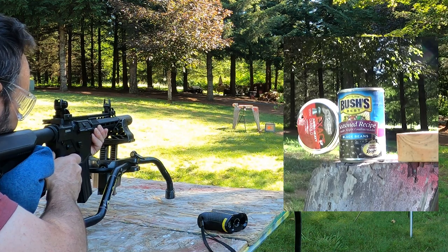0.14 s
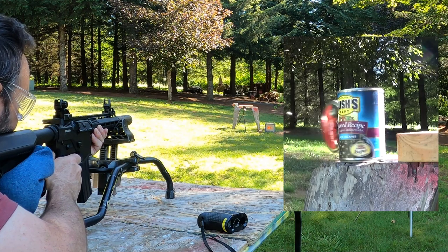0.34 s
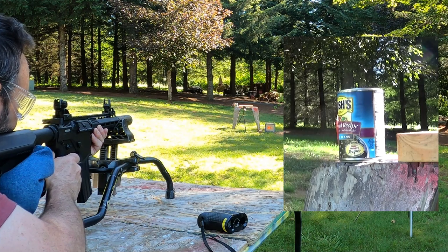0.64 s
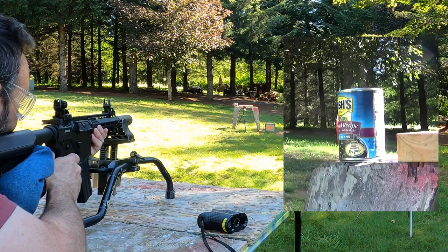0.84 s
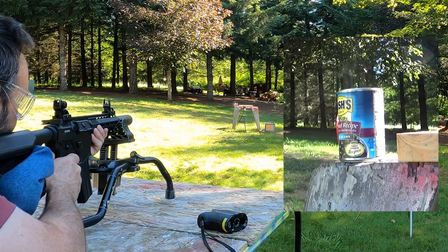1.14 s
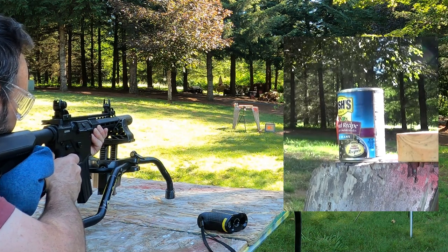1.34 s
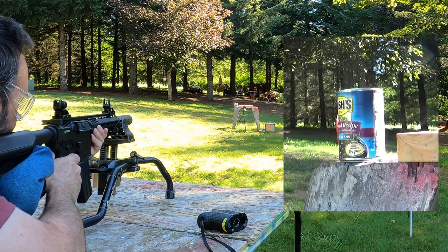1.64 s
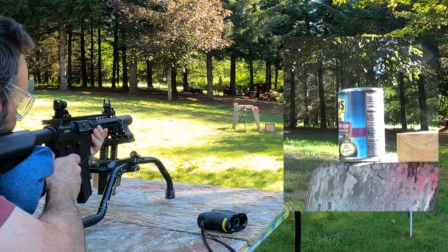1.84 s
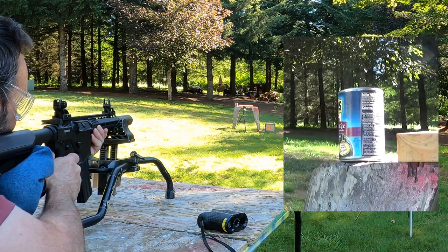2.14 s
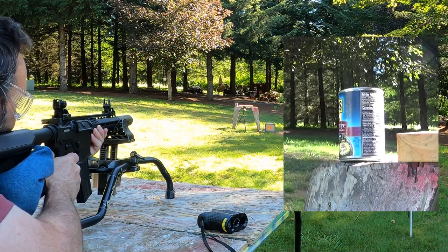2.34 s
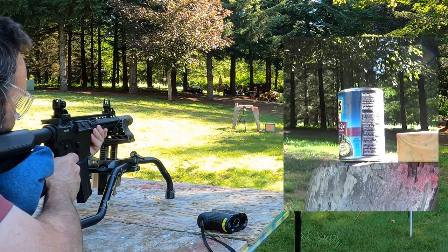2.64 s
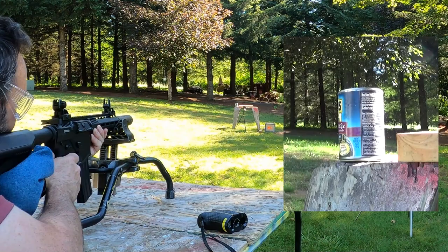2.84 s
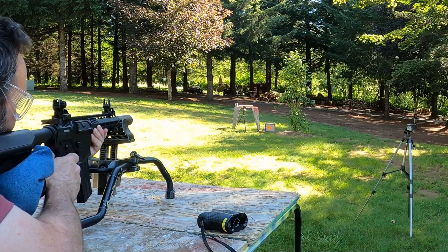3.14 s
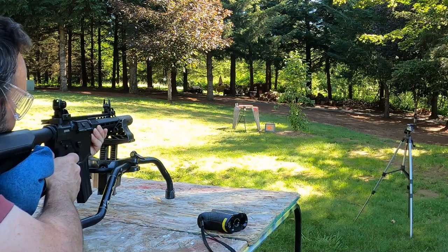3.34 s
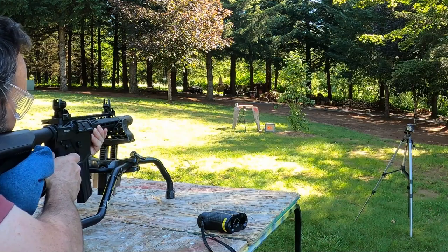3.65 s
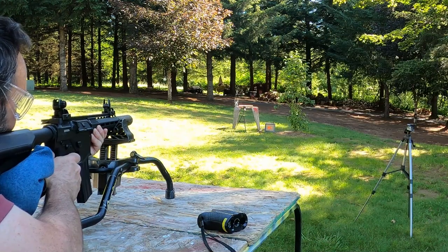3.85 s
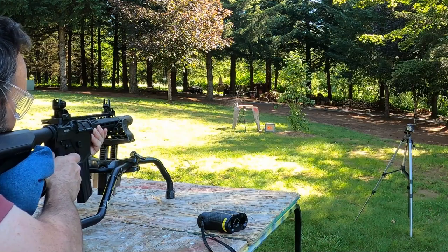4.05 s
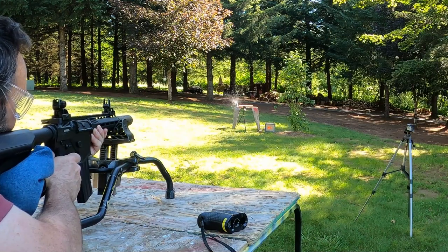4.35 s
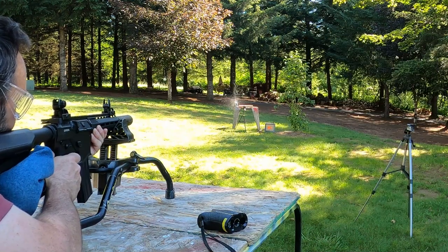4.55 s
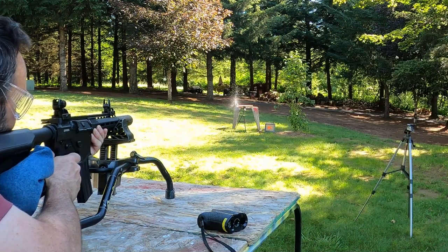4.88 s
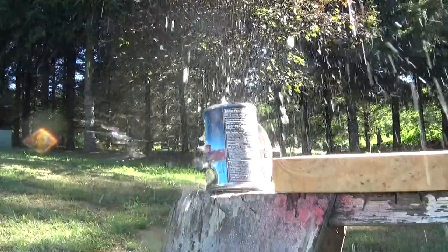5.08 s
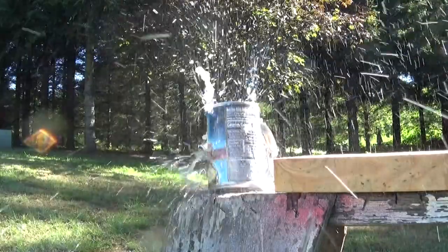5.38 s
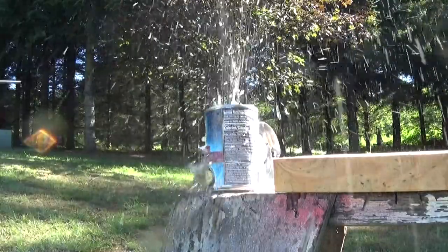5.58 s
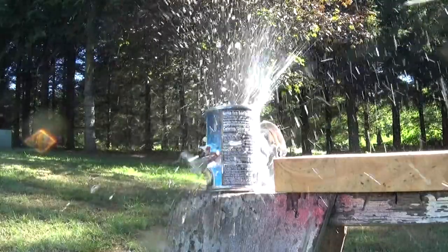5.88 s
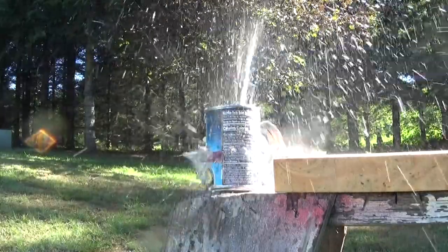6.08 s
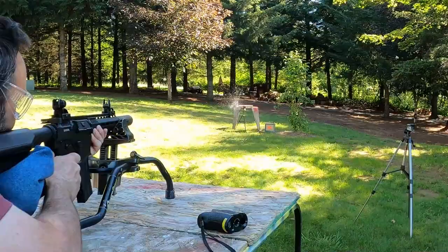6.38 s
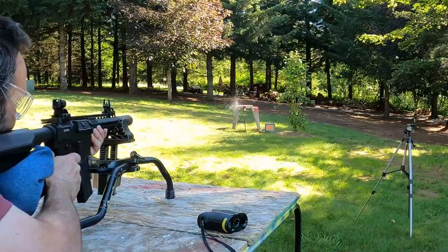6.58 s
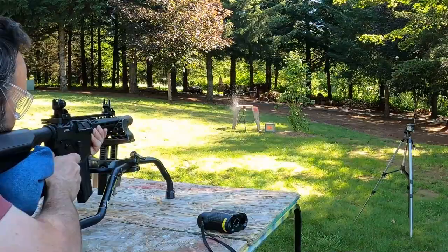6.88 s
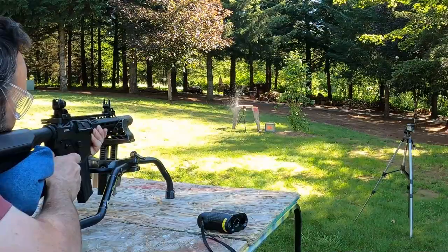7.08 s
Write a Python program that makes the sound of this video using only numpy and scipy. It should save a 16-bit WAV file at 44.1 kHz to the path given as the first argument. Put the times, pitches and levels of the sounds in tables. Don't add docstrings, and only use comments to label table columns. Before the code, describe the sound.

Outdoors, gears clatter and air hisses around two separate shots, a faint can ping follows, then rapid clacking fire runs to the end.

```python
import sys
import numpy as np
from scipy import signal
from scipy.fft import rfft, irfft, next_fast_len
from scipy.io import wavfile
from scipy.ndimage import uniform_filter1d

SR = 44100
rng = np.random.default_rng(int(sys.argv[2]) if len(sys.argv) > 2 else 0)


def wrap_up_sound(samples):
    columns = np.atleast_2d(samples).T
    tamed = np.clip(columns, -1, 1)
    steps = np.round(tamed * 32767).astype(np.int16)
    wavfile.write(sys.argv[1], SR, steps)


def magnitude_from_level(level_db):
    exponent = np.asarray(level_db, float) / 20
    return 10 ** exponent


N = 318402
OPPOSITE = np.array([[1], [-1]])


def evened(x):
    return x / np.sqrt(np.mean(x ** 2) + 1e-20)


def smooth(x, size):
    return uniform_filter1d(uniform_filter1d(x, size=size), size=size)


def read(points, hz):
    f, value = np.transpose(points)
    return np.interp(np.log(hz + 1), np.log(f + 1), value)


def add(mix, s, sound):
    part = mix[..., round(s * SR):][..., :sound.shape[-1]]
    part += sound[..., :part.shape[-1]]


def following(slam_rows, delay_s, db, hz, spread_db):
    when, size, pitch = rng.random((len(slam_rows), 3)).T
    start_s = np.array(slam_rows)[:, 0] + delay_s[0] + when * (delay_s[1] - delay_s[0])
    level_db = db + spread_db * (size - .5)
    return list(zip(start_s, level_db, hz[0] + pitch * (hz[1] - hz[0])))


# band_hz, lead_rad
PORT_LEAD = [(100, 0.13), (3000, 0.7), (7000, .1), (16000, 0.074)]


def noise(spectrum, likeness, patchy_db, size=512):
    hz = np.fft.rfftfreq(size, 1 / SR)
    draws = rng.standard_normal((4 * N // size + 5, len(hz), 5), dtype=np.float32)
    a, b, c, d, patches = draws.T
    patches = uniform_filter1d(uniform_filter1d(patches, size=8, axis=0), size=8, axis=1)
    same = np.clip(read(likeness, hz), -1, 1)[:, None]
    left = a + 1j * b
    right = same * left + np.sqrt(1 - same ** 2) * (c + 1j * d)
    z = np.array([left, right])
    z *= magnitude_from_level(read(spectrum, hz)[:, None] + patchy_db * evened(patches))
    z[0] *= np.exp(1j * read(PORT_LEAD, hz))[:, None]
    return evened(signal.istft(z, nperseg=size, noverlap=3 * size // 4)[1][:, :N])


# band_hz, density_db
YARD_COLOUR = [(26, -41.5), (45, -2.5), (170, -7), (290, -17.5), (672, -20), (2600, -26), (3160, -28),
               (16000, -41.5)]
# band_hz, likeness
YARD_LIKENESS = [(60, 1.0), (180, 1), (550, 0.2), (1650, 0.73), (4970, 0.27), (15000, 0.99)]


def yard():
    traffic = magnitude_from_level(-52.5) * noise(YARD_COLOUR, YARD_LIKENESS, patchy_db=1.4, size=2048)
    return signal.lfilter(*signal.butter(2, 52, "high", fs=SR), traffic)


# time_s, level_db
CRICKET_LEVEL = [(0, -65), (1.3, -56.5), (2.5, -61), (3.1, -55), (7.3, -94)]


def cricket():
    t = np.arange(N) / SR
    chirp = np.exp(-(((t * 30 + .1) % 1 - .5) / 0.091) ** 2)
    chirp *= magnitude_from_level(1.5 * np.repeat(rng.standard_normal(N // 1470 + 1), 1470)[:N])
    level = magnitude_from_level(np.interp(t, *np.transpose(CRICKET_LEVEL)))
    return level * chirp * np.sin(2 * np.pi * 2750 * t) * magnitude_from_level(1.5 * OPPOSITE)


# band_hz, t60_s
TREE_DECAY = [(250, 0.94), (700, 0.34), (1700, 1), (4500, 0.86), (9000, 0.63), (15000, 0.75)]


def trees(x):
    taps = np.zeros((2, SR))
    at = np.arange(200, SR - 20, 20) + rng.integers(0, 20, (2, (SR - 201) // 20))
    np.put_along_axis(taps, at, rng.choice([-1., 1.], at.shape), 1)
    taps[1] = 0.68 * taps[0] + 0.79 * taps[1]
    taps *= np.minimum(np.arange(SR) / SR / 0.038, 1)
    hz, t, z = signal.stft(taps, SR, nperseg=256)
    colour = [(300, -5.5), (1000, -9.5), (1400, -0.5), (9000, 2.0), (15000, -10.5)]
    z *= magnitude_from_level(read(colour, hz)[:, None])
    z *= magnitude_from_level(-60 * t / read(TREE_DECAY, hz)[:, None])
    tail = signal.istft(z, SR, nperseg=256)[1]
    tail /= np.linalg.norm(tail[0])
    return signal.fftconvolve(x.mean(0)[None], tail, axes=1)[:, :N]


# pitch_hz, level_db, t60_s
CAN_MODES = [(367, -18, .8), (1933, -22, .72), (2040, -22, .58), (2519, -20, .66), (2880, -16, .45),
             (2921, -18, 1.2), (3332, -27, .9), (3370, -15, .3), (3871, -17, .4), (3990, -3, .12),
             (4097, -16, .55), (4460, -24, .9), (5130, -28, 1), (5265, -11, .46),
             (900, -31, .9), (1360, -31, .7), (1470, -35, .6), (1740, -36, .5), (5830, -16, .39),
           (6175, -18, .6), (6654, -22, .45), (7181, -22, .58), (7461, -18, .46), (7850, -22, .9),
           (8500, -25, .5), (8877, -24, .45), (9109, -22, .62), (10357, -25, .46)]


def tin():
    out, t = np.zeros((2, N)), np.arange(30000) / SR
    ring = (magnitude_from_level(-2 - 60 * t / 0.06) + magnitude_from_level(-9 - 60 * t / .5)) * rng.standard_normal((2, len(t)))
    ring = signal.lfilter(*signal.butter(2, [2500, 9000], "band", fs=SR), ring)
    modes = CAN_MODES
    for (hz, db, t60_s), cluster in zip(modes, rng.random((len(modes), 2, 2))):
        for k, (a, b) in enumerate(cluster):
            split = 1 + 0.014 * k * (a - .5)
            phase = 2 * np.pi * b + .6 * OPPOSITE * a
            flutter_db = 2.4 * np.sin(2 * np.pi * ((6 + 18 * b) * t + a))
            level = magnitude_from_level(db - 3.4 * k + flutter_db - 60 * t / t60_s)
            ring += level * np.sin(2 * np.pi * hz * split * t + phase)
    add(out, 2.5925, magnitude_from_level(-25 - 1.3 * OPPOSITE) * ring)
    return out


# start_s, pitch_hz, level_db, length_s, rise_hz
SHORT_RINGS = [(0.395, 1242, -24.5, 0.035, -30.5), (0.4, 1984, -24, 0.028, 201.5),
               (0.403, 3000, -29, .032, 0), (0.442, 349, -32.5, .075, 0), (0.437, 945, -37.5, 0.064, 0),
               (0.505, 935, -33.5, 0.047, 5), (0.497, 2450, -29, 0.012, 0),
               (1.897, 2070, -25.5, 0.038, 0.5), (1.899, 3070, -24, 0.019, 0), (1.967, 351, -37, .12, 2),
               (1.996, 2540, -25.5, 0.015, 0), (3.588, 2900, -27, 0.037, 0), (3.59, 1445, -30, 0.034, 0),
               (3.593, 934, -28, 0.073, -2), (3.69, 1433, -29, 0.071, 0), (3.799, 940, -32, 0.097, 0),
               (3.894, 1443, -27.5, 0.064, 0), (3.905, 930, -31.5, 0.066, 0),
               (4.011, 930, -26.5, 0.038, 0), (4.041, 956, -21.5, 0.037, 90), (4.11, 962, -25, 0.043, 50),
               (4.108, 616, -28.5, 0.061, 0), (4.216, 944, -32, 0.073, 2), (4.313, 926, -28.5, .085, 3),
               (4.402, 1123, -28, .026, 0), (4.524, 639, -26.5, 0.045, -5), (4.832, 1100, -25, 0.021, 40),
               (4.915, 1410, -19, 0.0097, -100), (5.023, 1460, -22.5, .012, 0),
               (4.814, 2080, -25.5, .016, 0), (5.124, 1850, -24, 0.014, 0), (5.632, 3270, -22, .014, 0),
               (5.16, 1470, -23, 0.013, 0), (5.43, 748, -27.5, 0.06, 0), (5.585, 3130, -30, 0.021, 0),
               (5.788, 1250, -26.5, 0.015, 200), (5.946, 1045, -28, 0.033, 247),
               (6.044, 1420, -17.5, .014, 0), (6.148, 1150, -21.5, 0.017, 0)]


def notes():
    out = np.zeros((2, N))
    for (s, hz, db, length_s, rise_hz), luck in zip(SHORT_RINGS, rng.random((len(SHORT_RINGS), 2))):
        t = np.arange(0, length_s, 1 / SR)
        waver = 0.5 * np.sin(2 * np.pi * (35 * t + luck[0])) + .3 * OPPOSITE
        turns = hz * t + rise_hz * t * (t / length_s - 1) / 2
        level = magnitude_from_level(db - 9.5 * t / length_s) * signal.windows.tukey(len(t), .4)
        add(out, s, level * np.sin(2 * np.pi * turns + waver))
    return out


# time_s, shaft_hz, level_db
MOTOR_STARTS = [
    [(1.64, 502, -54), (1.67, 590, -48), (1.705, 605, -47)],
    [(3.42, 460, -49), (3.47, 651, -50), (3.505, 602, -33)],
]


def motor():
    out = np.zeros(N)
    wobble = evened(smooth(rng.standard_normal((3, N)), 150))
    for rows in MOTOR_STARTS:
        s, hz, db = np.transpose(rows)
        t = np.arange(s[0], s[-1], 1 / SR)
        w = wobble[:, round(s[0] * SR):][:, :len(t)]
        turns = np.cumsum(np.interp(t, s, hz) * (1 + 0.0085 * w[0])) / SR
        tone = np.zeros(len(t))
        for harmonic, level_db, drift in zip((1, 2, 4), (-3., -4., 3.), w):
            tone += magnitude_from_level(level_db + 2.23 * drift) * np.sin(2 * np.pi * harmonic * turns)
        add(out, s[0], magnitude_from_level(np.interp(t, s, db)) * tone * signal.windows.tukey(len(t), .2))
    return out


# time_s, hiss_db, whirr_db, rumble_db
TRIGGER_PULLS = [
    [(0.085, -31.5, -33, -42), (0.321, -41, -35.5, -46), (0.56, -38, -48, -53.5)],
    [(1.635, -50, -40.5, -47), (1.72, -34.5, -35, -46.5), (1.879, -36, -39.5, -48),
     (2.08, -41, -42.5, -52.5)],
    [(3.42, -46, -36, -47.5), (3.52, -31.5, -34, -44), (3.66, -35, -37, -40.5), (3.94, -36.5, -39, -37.5),
     (4.36, -36, -41, -42.5), (4.86, -37, -39.5, -36.5), (6.1, -38.5, -40, -46), (6.3, -36.5, -48, -53.5),
     (6.45, -35.5, -45, -53)],
]
# centre_s, level_db, half_length_s
AIR_PUFFS = [(0.171, -22, 0.0063), (0.287, -20.5, 0.0033), (0.45, -22, 0.02), (0.496, -19.5, 0.01),
             (1.16, -60, 0.05), (1.783, -30.5, 0.013), (1.963, -32, 0.042), (4.123, -21.5, 0.0081),
             (4.256, -27, 0.024), (5.549, -25.5, 0.021), (5.589, -33.5, 0.015), (5.945, -23, 0.0044),
             (6.106, -28, 0.017)]
# band_hz, density_db
HISS_COLOUR = [(1470, -18.5), (2500, -1), (3520, -0.5), (5390, 1.5), (9960, 2), (12000, -11),
               (14600, -13.5), (16500, -22.5)]
WHIRR_COLOUR = [(350, -25.5), (600, -19.5), (831, 5.5), (1030, -3.5), (1120, 2), (4000, -6.5), (5200, -39),
                (8800, -120)]
RUMBLE_COLOUR = [(88, -38), (150, -11), (249, -18.5), (313, -2.5), (423, -7), (750, -11), (980, -32),
                 (1650, -120)]
# band_hz, likeness
GUN_LIKENESS = [(60, 1), (550, 0.94), (1650, 0.95), (4000, 0.7), (8000, 0.9), (15000, 1)]


def mechanism():
    t, layers = np.arange(N) / SR, np.zeros((3, N))
    for rows in TRIGGER_PULLS:
        s, *levels_db = np.transpose(rows)
        held = np.clip((t - s[0]) / 0.036, 0, 1) * np.clip((s[-1] - t) / 0.03, 0, 1)
        layers += held * magnitude_from_level(np.array([np.interp(t, s, db) for db in levels_db]))
    hiss, whirr, rumble = layers
    slam_s = np.array(SLAMS)[:, 0]
    since_s = t - slam_s[np.searchsorted(slam_s, t) - 1]
    jolt = np.minimum(since_s / 0.0013, 1) - since_s / 0.067
    shaken = np.where((since_s > 0) & (since_s < .12), jolt, -.3)
    rumble, whirr = rumble * magnitude_from_level(9.2 * shaken), whirr * magnitude_from_level(8.1 * shaken)
    around_s = np.arange(-5000, 5000) / SR
    for s, db, half_s in AIR_PUFFS:
        add(hiss, s + around_s[0], magnitude_from_level(db) * np.exp(-(around_s / half_s) ** 2))
    lead_s = np.arange(900) / SR
    leak_db = -33.5 - 2300 * np.maximum(lead_s[::-1] - .005, 0)
    for (s, _, _), weaker in zip(SHOTS, rng.random(len(SHOTS))):
        add(hiss, s - .0018 - 900 / SR, magnitude_from_level(leak_db - 4 * weaker))
    fast = evened(smooth(rng.standard_normal(N), 120))
    slow = evened(smooth(rng.standard_normal(N), 700))
    hiss *= magnitude_from_level(2.74 * fast + 1.1 * slow)
    out = hiss * noise(HISS_COLOUR, GUN_LIKENESS, patchy_db=3.54)
    out += whirr * noise(WHIRR_COLOUR, GUN_LIKENESS, patchy_db=2.2)
    return out + rumble * noise(RUMBLE_COLOUR, GUN_LIKENESS, patchy_db=2.9, size=1024)


# middle_tooth_s, peak_db, centre_hz, thump_db
GEAR_CATCHES = [(0.1032, -6, 7400, -22), (0.2103, -3, 8500, -24), (0.3138, -5.5, 7700, -25.5),
                (0.5021, -27, 7500, -52.5), (1.7116, -10, 8500, -25), (1.815, -6.5, 8480, -25),
                (2.0008, -9, 5900, -49), (3.5079, -5.5, 8900, -23.5)]


def catches():
    out, t = np.zeros((2, N)), np.arange(-200, 3000) / SR
    after, early = np.maximum(t - .004, 0), t - t[0]
    teeth = sum(magnitude_from_level(d) * np.exp(-((t - at) / .0007) ** 2) for at, d in [(-.0028, -8.5), (0, -3.5), (.0027, -4)])
    thump = np.sin(2 * np.pi * 535 * after) * magnitude_from_level(-60 * after / 0.05)
    thump += 0.76 * np.sin(2 * np.pi * 1250 * after) * magnitude_from_level(-60 * after / 0.044)
    push = 0.57 * np.sin(2 * np.pi * 135 * early) * magnitude_from_level(-60 * early / 0.055)
    blow = thump * (1 - np.exp(-after / 0.0018)) + push
    luck = rng.standard_normal((len(GEAR_CATCHES), 2, len(t)))
    for (s, db, hz, thump_db), grit in zip(GEAR_CATCHES, luck):
        band = signal.butter(3, [0.73 * hz, 1.175 * hz], "band", fs=SR)
        grit = signal.lfilter(*band, grit[0] + 0.28 * grit)
        add(out, s + t[0], magnitude_from_level(db - 4.5) * teeth * evened(grit) + magnitude_from_level(thump_db) * blow)
    return out


def whistles():
    length_s = 0.0081
    out, t = np.zeros(N), np.arange(0, length_s, 1 / SR)
    for (s, _, _), (a, b) in zip(SHOTS, rng.random((len(SHOTS), 2))):
        hz = (0.81 + 0.39 * a) * np.interp(t, [0, length_s], (5156, 3000))
        chirp = np.hanning(len(t)) * np.sin(2 * np.pi * np.cumsum(hz) / SR)
        add(out, s - .002 - length_s, magnitude_from_level(-28 - 6 * b) * chirp)
    return out


# start_s, peak_db, pitch_hz
HOLLOW_THUDS = [(1.915, -20.5, 319), (1.934, -23, 379), (1.948, -22, 469), (2.39, -46, 364),
                (3.732, -17, 291), (3.821, -22.5, 316), (3.84, -24.5, 370), (3.934, -20, 326),
                (4.03, -21, 457), (4.181, -16.5, 441), (4.446, -23, 306), (4.526, -21, 317),
                (4.618, -22, 287), (4.64, -20, 313), (4.67, -13, 381), (4.702, -21, 545),
                (4.748, -22.5, 310), (4.938, -20.5, 302), (5.001, -22, 383), (5.066, -24, 360),
                (5.217, -24.5, 388), (5.24, -22.5, 509), (5.314, -18, 339), (5.353, -21.5, 306),
                (5.415, -22, 400), (5.454, -22, 300), (5.499, -18.5, 330), (5.595, -26, 335),
                (5.929, -25, 349), (3.612, -24.5, 403), (4.766, -25, 637), (4.795, -24, 404),
                (4.852, -26, 329), (5.862, -29, 352), (6.056, -27, 542), (5.755, -26.5, 800)]


def thuds():
    out, t = np.zeros((2, N)), np.arange(8000) / SR
    lead = .3 * OPPOSITE
    sag_s = .12 * .012 * (1 - np.exp(-t / .012))
    rows = HOLLOW_THUDS + following(SHOTS[2:], (0.0117, 0.11), -38, (300, 559), spread_db=14.0)
    rows += [(s, -25, 500) for s, _, _ in BLANKS]
    for (s, db, hz), (a, b, c) in zip(rows, rng.random((len(rows), 3))):
        decay = magnitude_from_level(-60 * t / 0.031) + magnitude_from_level(-11.0 - 60 * t / 0.14)
        ring = np.sin(2 * np.pi * hz * (t + sag_s) + lead) * decay
        ring += 0.35 * np.sin(2 * np.pi * hz * (1.3 + .5 * a) * t + lead + 6 * c) * magnitude_from_level(-60 * t / 0.05)
        ring += 0.15 * np.sin(2 * np.pi * hz * (.7 + 0.141 * b) * t + lead) * magnitude_from_level(-60 * t / 0.18)
        add(out, s - .005, magnitude_from_level(db + 5.0) * (1 - np.exp(-t / 0.0026)) * ring)
    return out


# start_s, peak_db, centre_hz
SHARP_SNAPS = [(0.1782, -8, 4400), (0.2917, -9, 5400), (0.5308, -23, 7200), (1.1058, -32, 7600),
               (1.7871, -18, 6600), (2.392, -42, 10000), (3.7074, -12, 10600), (3.7136, -13, 9200),
               (3.8577, -11, 10000), (3.8749, -12, 10000), (4.1039, -11, 9500), (4.1534, -9, 8700),
               (4.4447, -11, 6900), (4.5223, -12, 6800), (4.6375, -14, 8300), (4.8629, -13, 7400),
               (4.9732, -10, 7800), (5.0368, -12, 8900), (5.1379, -9, 5800), (5.1626, -12, 6600),
               (5.2007, -11, 8400), (5.2667, -12, 7100), (5.352, -13, 8400), (5.4407, -13, 8200),
               (5.5484, -11, 9700), (5.5523, -11, 8500), (5.6721, -11, 8100), (5.7859, -16, 8600),
               (5.856, -16, 8600), (6.0114, -13, 7400)]
# start_s, peak_db, centre_hz
FUZZY_TICKS = [(3.6087, -10, 8670), (3.7234, -17, 2100), (3.8137, -18, 2090), (3.9176, -17, 8570),
               (3.9527, -11.5, 8520), (4.06, -9, 10100), (4.2426, -7, 2100), (4.33, -7.5, 6170),
               (4.365, -11, 9900), (4.424, -7, 7050), (4.4742, -13, 9490), (4.559, -29, 3070),
               (4.6952, -9, 8610), (4.781, -18, 6110), (4.802, -13, 9750), (4.8375, -10, 9000),
               (4.8946, -11, 10000), (5.0456, -3.5, 9150), (5.256, -8, 6100), (5.2814, -25, 8960),
               (5.3095, -10, 6610), (5.4814, -17, 9000), (5.5144, -10, 9700), (5.649, -18, 7800),
               (5.696, -14, 6260), (5.7296, -11, 8000), (5.7574, -16, 8950), (5.8037, -13, 8530),
               (5.8271, -13, 8770), (5.915, -14, 8640), (5.9688, -21, 8660), (6.03, -5.5, 4000),
               (6.0716, -15, 4680), (6.0911, -5, 4990), (6.237, -18, 8100)]


def snaps():
    out, t, hz = np.zeros((2, N)), np.arange(512) / SR, np.fft.rfftfreq(512, 1 / SR)
    sharp = SHARP_SNAPS + following(SHOTS, (0.0016, .004), -13.5, (6300, 8300), spread_db=6)
    sharp += following(BLANKS * 3, (0, .006), -19, (5600, 7000), spread_db=6)
    fuzzy = [(s + .001, db - 10, centre_hz) for s, db, centre_hz in FUZZY_TICKS]
    fuzzy += following(2 * SHOTS[2:], (.009, .09), -26, (2800, 12600), spread_db=6)
    for rows, t60_s in ((sharp, 0.0027), (fuzzy, 0.011)):
        grit, sides = rng.standard_normal((len(rows), 512)), rng.standard_normal((len(rows), 1))
        shape = np.minimum(t / 0.00024, 1) * magnitude_from_level(-60 * t / t60_s)
        for (s, db, centre_hz), g, side in zip(rows, grit, sides):
            spread_hz = 3500 + 0.9 * max(8500 - centre_hz, 0)
            floor_hz = 700 + 0.67 * max(centre_hz - 5500, 0)
            band = np.exp(-((hz - centre_hz) / spread_hz) ** 2 - (floor_hz / (hz + 1)) ** 2)
            burst = shape * irfft(rfft(g) * band)
            add(out, s - .0004, magnitude_from_level(db + 6.5 + .5 * side * OPPOSITE) * burst / abs(burst).max())
    return out


# start_s, peak_db
AIR_PUSHES = [(3.692, -19), (4.1, -18.5), (4.2049, -6.5), (5.024, -20), (5.531, -24.5), (5.741, -19.5),
              (6.05, -24.5)]


def pushes():
    out, t = np.zeros(N), np.arange(4000) / SR
    u = t / 0.0004
    spike = u * np.exp(1 - u)
    dip = 0.099 * (t / 0.0029) ** 2 * np.exp(-t / 0.0033)
    swing = 0.1 * np.sin(np.pi * t / t[-1]) * np.exp(-t / 0.027)
    for s, db in AIR_PUSHES:
        add(out, s, magnitude_from_level(db) * (spike - dip + swing))
    turn_rad = .38 * OPPOSITE
    return (signal.hilbert(out, next_fast_len(N))[:N] * np.exp(1j * turn_rad)).real


# start_s, peak_db, knock_db under the crack
SHOTS = [(0.395, 0.5, -32), (1.898, 0.5, -40), (3.5858, -6.5, -30.5), (3.691, -7.5, -21),
         (3.7916, -8.5, -21), (3.895, -10, -35), (3.996, -8, -26), (4.099, -6.5, -18.5), (4.202, -10, -7),
         (4.3026, -9.5, -34), (4.4055, -7, -46), (4.5083, -7.5, -37), (4.6103, -7.5, -14),
         (4.713, -4, -17.5), (4.813, -8, -18), (4.9183, -5, -14.5), (5.021, -4, -14.5), (5.1228, -4.5, -16),
         (5.227, -6, -14), (5.3299, -4, -19.5), (5.4305, -8, -16.5), (5.5325, -6, -15), (5.6353, -6.5, -29),
         (5.7408, -6, -19), (5.8415, -6.5, -11), (5.9445, -13.5, -7), (6.0478, -8.5, -9.5),
         (6.1483, -9.5, -9)]
# start_s, peak_db, knock_db under the crack
BLANKS = [(6.1726, -20, -3), (6.2738, -18, -5), (6.3775, -17, -6)]
SLAMS = SHOTS + BLANKS
# band_hz, density_db
CRACK_COLOUR = [(1470, -11), (2500, -1.5), (3680, 0), (4890, -3), (6600, 0.5), (10400, 4.5), (15600, -20),
                (16500, -50.5)]


def slams():
    out, t = np.zeros((2, N)), np.arange(5000) / SR
    air = noise(CRACK_COLOUR, GUN_LIKENESS, patchy_db=0.53)
    knock_colour = [(150, -26), (400, -10.0), (900, 0), (1300, 0.5), (2200, -2.5), (3500, -20), (6000, -27)]
    body = noise(knock_colour, GUN_LIKENESS, patchy_db=3)
    for (s, db, knock_db), (a, b, c) in zip(SLAMS, rng.random((len(SLAMS), 3))):
        at = round(s * SR)
        blast_t60_s = .04 * (1 + .6 * (c - .5))
        rebound = np.maximum(t - .002 - 0.0041 * a, 0)
        shape = magnitude_from_level(7.0 - 60 * t / 0.0038) + magnitude_from_level(-7.0 - 60 * t / blast_t60_s)
        shape += magnitude_from_level(-17.0 - 60 * rebound / 0.039) * (rebound > 0)
        blast = air[:, at:at + len(t)] / air[:, at:at + 30].std()
        knock = .8 * body[:, at:at + len(t)]
        knock = knock + .9 * np.sin(2 * np.pi * 1250 * (.9 + .2 * b) * t) * magnitude_from_level(-60 * t / .05)
        knock *= magnitude_from_level(knock_db + 6.5 - 60 * t / 0.061) * np.minimum(t / 0.001, 1)
        add(out, s, magnitude_from_level(db - 7.5) * (shape * blast + knock))
    return out


AGAIN_FROM, AGAIN_AT = 184250, 282838


def scene():
    gun = mechanism() + slams() + catches() + snaps() + thuds() + whistles() + motor() + notes() + tin()
    mix = gun + magnitude_from_level(-13.0) * trees(gun) + pushes() + yard() + cricket()
    mix[:, AGAIN_AT:] = mix[:, AGAIN_FROM:AGAIN_FROM + N - AGAIN_AT]
    return mix


def roll_off(x):
    return signal.sosfilt(signal.butter(12, 17000, fs=SR, output="sos"), x)


# band_hz, left_over_right_db
PORT_BALANCE = [(60, -0.5), (180, 0.5), (550, -1.5), (1650, 0.5), (4970, 0.5), (15000, -1)]


def record(dry):
    duck_db = np.zeros(N)
    slams_at = np.round(np.array(SLAMS)[:, 0] * SR)
    repeats_at = (slams_at + AGAIN_AT - AGAIN_FROM)[slams_at > AGAIN_FROM]
    for at in [*slams_at, *repeats_at]:
        add(duck_db, at / SR - .0021, 11 * signal.windows.tukey(90, .3))
    lean_db = read(PORT_BALANCE, np.fft.rfftfreq(N, 1 / SR)) * .5 * OPPOSITE
    ports = irfft(rfft(dry) * magnitude_from_level(lean_db), N)
    soft = .6 * np.tanh(ports / magnitude_from_level(duck_db) / .6)
    edge = signal.firwin(255, 15900, fs=SR)
    mix = signal.oaconvolve(soft, edge[None], "same")
    return roll_off(mix)


dry = scene()
out = record(dry)
wrap_up_sound(out)
```